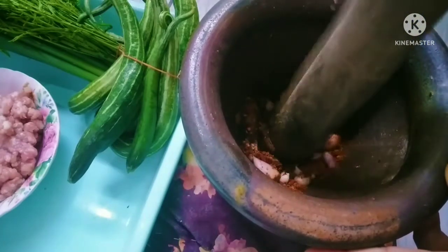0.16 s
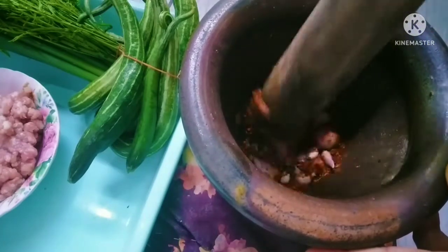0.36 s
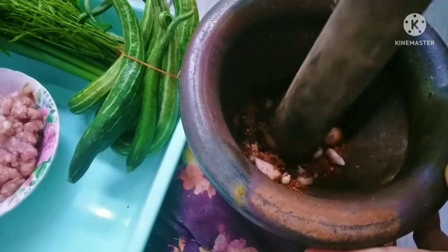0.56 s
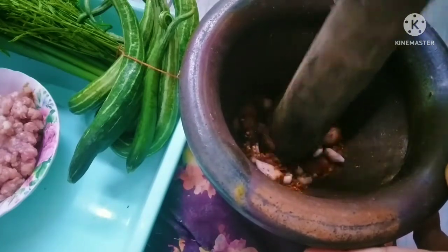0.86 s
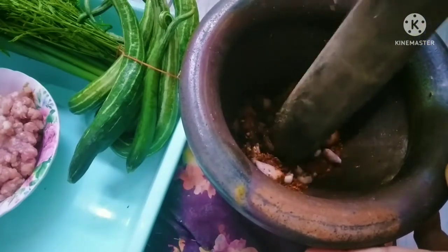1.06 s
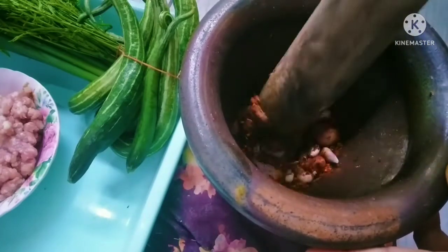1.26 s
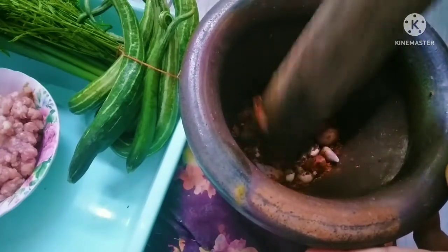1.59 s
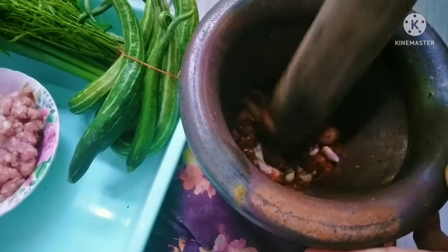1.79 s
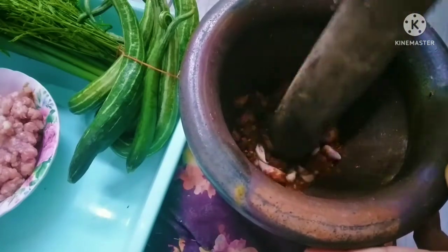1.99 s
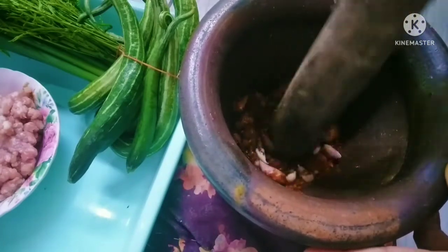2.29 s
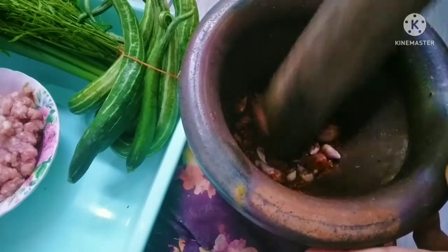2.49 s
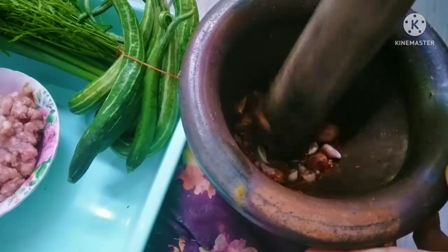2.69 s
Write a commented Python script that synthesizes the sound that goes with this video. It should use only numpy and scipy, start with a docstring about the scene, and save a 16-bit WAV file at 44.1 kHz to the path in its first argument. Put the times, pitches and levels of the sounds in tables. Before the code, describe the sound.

A pestle pounds garlic and chili in a clay mortar with steady, crunchy thuds.

```python
"""A wooden pestle pounds garlic, shallots and chili in a clay mortar, a little over three blows a second.
Each blow scrapes down the wall, crushes the paste in a burst of tiny cracks and knocks the hollow bowl;
the mortar rocks and rebounds on a booming table. Twice the pestle slips and ticks against the wall.
A small kitchen answers. Behind it sit thin distant chirps, a hiss that drops out now and then
and a low rumble."""
import sys
import numpy as np
from scipy import signal
from scipy.fft import rfft, irfft
from scipy.io import wavfile

SR = 44100
rng = np.random.default_rng(int(sys.argv[2]) if len(sys.argv) > 2 else 0)


def bounce(signal):
    """Save signal as a 16-bit WAV file at the path given by the first command-line argument."""
    frames = np.transpose(np.atleast_2d(signal))
    limited = np.clip(frames, -1, 1)
    pcm = np.round(limited * 32767).astype(np.int16)
    wavfile.write(sys.argv[1], SR, pcm)


N = 125685

# pestle blows (time [s], thump gain [dB], knock gain [dB], knock pitch [Hz], knock t60 [s],
# clay gain [dB], crush gain [dB], crush length [s], treble gain [dB], scrape gain [dB])
BLOWS = [(0.2038, 1.5, -2.5, 361, 0.059, -9, -3.5, .0015, 2, -12.5),
         (0.499, 1, 1, 628, 0.031, -5.5, -5, 0.0055, -2.5, -17),
         (0.7987, -1.5, 2.5, 737, 0.042, -1, -6.5, 0.0064, -1.5, -4),
         (1.093, -1, 8, 584, 0.023, -3, -2.5, 0.0052, -1, 4),
         (1.3884, -0.5, -6.5, 585, 0.039, 3.5, -8.5, 0.0019, 2.5, 8.5),
         (1.681, 0, 4, 624, 0.037, 2, -4.5, 0.0074, 1, 3),
         (1.9776, 0.5, 3, 627, 0.035, -2.5, -3.5, 0.0049, 1, -2.5),
         (2.2766, 1.5, 5.5, 647, 0.018, -2.5, -1, 0.0038, -4, -12),
         (2.5702, 1, 13.5, 611, 0.024, 2.5, 6, 0.0022, 0.5, -4.5)]
# the pestle slips against the wall (time [s], crush gain [dB])
SLIPS = [(1.125, -18), (1.412, -11)]
# tone of the crunch (frequency [Hz], gain [dB])
CRUSH_EQ = [(150, -66), (350, 5), (750, -5), (1100, -8.5), (1400, -5.5), (1800, -4.5), (2400, 0.5),
            (3200, 2.5), (4200, -2.5), (5200, -7.5), (6400, -8.5), (7300, -5), (8700, -15.5),
            (10700, -16.5), (12500, -22.5), (15500, -30)]
# modes of the bowl, struck through the paste (frequency [Hz], level [dB], t60 [s])
BOWL_MODES = [(300, -40, 0.084), (375.7, -35, 0.042), (418, -53.5, 0.15), (594.5, -50, .25)]
# resonances of the clay wall (frequency [Hz], relative level [dB], t60 [s])
CLAY_MODES = [(1400, -15, 0.074), (1852, 0.5, 0.0083), (2081, -2, 0.0087), (2391, 5.5, 0.0083),
              (2782, -0.5, 0.016), (3360, -6.5, 0.0083), (4263, -5.5, 0.023)]
# boom of the table, led by a slowly beating pair of low room modes (frequency [Hz], level [dB], t60 [s])
BOOM_MODES = [(55.6, -38, 1), (61.36, -37, 1.0), (101.6, -17.5, 0.11), (122.6, -29, 0.42),
              (138.05, -27.5, 0.62), (158.03, -33, 0.76), (173.56, -26.5, 0.39), (198.45, -35, 0.61),
              (234.4, -37, 0.13)]
# the blow's own push, then the mortar's rebounds after it (delay [s], level [dB])
REBOUNDS = [(.0022, -18), (0.0112, -19.5), (.019, -27), (0.0238, -19.5), (.0402, -22.5), (0.056, -24)]
# decay of the kitchen's tail (frequency [Hz], t60 [s])
ROOM_DECAY = [(200, 0.55), (600, 0.2837), (2500, 0.43), (7000, 0.42), (14000, 0.42)]
# tone of that tail (frequency [Hz], gain [dB])
ROOM_EQ = [(80, -13), (300, -9.5), (700, -9), (2500, -13.5), (7000, -13.5), (14000, -14.5)]
# distant chirps (start [s], length [s], level [dB])
CHIRPS = [(0.282, 0.11, -58), (1.225, 0.28, -61.5), (1.941, .08, -54), (2.627, 0.1, -58),
          (2.754, 0.12, -57.5)]
# tone of the hiss (frequency [Hz], gain [dB])
HISS_EQ = [(300, -5), (900, 5.5), (1500, 2.5), (3000, 7), (5000, 0), (6500, -0.5), (7400, 1), (8800, -6.5),
           (10700, -10.5), (12500, -17), (15500, -19)]
# fader ride on the hiss (time [s], level [dB])
HISS_RIDE = [(0, -62), (.35, -62), (.9, -62), (0.999, -64.5), (1.249, -62), (1.6, -61), (1.9, -62),
             (2.35, -59.5), (2.55, -59), (2.741, -63), (2.85, -64)]
# treble dropouts in the background (start [s], end [s])
LULLS = [(.072, .198), (.398, .492), (.616, .79), (.921, .998), (1.891, 1.96), (2.128, 2.27)]
# tone of the rumble (frequency [Hz], gain [dB])
RUMBLE_EQ = [(20, -9), (40, -1.5), (60, 1), (85, -4), (115, -17), (150, -9), (200, -17.5), (300, -27.5),
             (500, -30.5), (750, -35), (1300, -49), (3000, -63.5), (8000, -73.5), (15000, -81)]
# how alike the two channels are (frequency [Hz], likeness [0-1])
STEREO_LIKENESS = [(100, 1), (600, 0.62), (2000, 0.82), (5000, 0.27), (14000, 1)]
# balance of the two microphone ports (frequency [Hz], left minus right [dB])
PORT_BALANCE = [(200, -1.5), (380, 4), (600, -5.5), (900, 0.5), (2000, 1.5), (3500, 1), (5000, 3),
                (7300, 11.5), (8800, 3), (10700, -21.5), (13000, -1), (15000, -3)]
# phase between the ports (frequency [Hz], left lead [rad])
PORT_PHASE = [(0, 0), (2760, 1.5337), (4130, 1.36), (4650, 6.5), (5600, 7.5), (6890, 9), (7670, 4.5),
              (11800, 8), (13100, 8), (15500, 8)]

PRE_ROLL_S = .05  # space for the scrape ahead of each impact


def pounding():
    """Every blow and slip of the pestle; returns the close sound and the kitchen's answer."""
    t = np.arange(SR) / SR - PRE_ROLL_S
    close, room = np.zeros((2, 2, N))
    for time, thump_db, knock_db, knock_hz, knock_t60, clay_db, *paste in BLOWS:
        grit = crush(t, *paste)
        hit = grit + amp(knock_db) * knock(t, knock_hz, knock_t60) + amp(clay_db) * clay_ring(t, grit)
        add(close, time - PRE_ROLL_S, hit + amp(thump_db) * thump(t))
        add(room, time - PRE_ROLL_S, kitchen(hit))
    for time, db in SLIPS:
        add(close, time - PRE_ROLL_S, crush(t, db, length=.0012, treble_db=-11, scrape_db=-25))
    # the table still rings from a blow 0.09 s before the start
    return close + amp(-4.5) * thump(np.arange(N) / SR + .09), room


def crush(t, crush_db, length, treble_db, scrape_db):
    """A swelling scrape down the wall, then a burst of tiny cracks as the paste gives way."""
    rise_s, fall_s, swell_s, scrape_s, grain_db = .0011, .002, .012, .023, 3.5
    scrape = np.exp(-abs(t) / swell_s) * np.clip((t + scrape_s) / .004, 0, 1) * (t < 0)
    burst = np.exp(np.minimum(t + length, 0) / rise_s - np.maximum(t, 0) / fall_s)
    burst *= np.clip(1 + t / length / 2, .5, 1)  # leans into the impact
    cracks = rng.standard_normal((2, len(t))) * amp(grain_db * np.minimum(rng.exponential(1, len(t)), 5))
    grit = unit(eq(stereo(cracks), CRUSH_EQ))
    grit = eq(grit, [(2300, 0), (9200, treble_db)])  # high shelf
    return grit * (amp(crush_db - 28.5) * burst + amp(scrape_db - 44) * scrape)


def knock(t, cavity_hz, cavity_t60):
    """The bowl rings under the paste; the air inside adds the hollow note."""
    rise_s, cavity_db = .0019, -27.5
    return ring(BOWL_MODES + [(cavity_hz, cavity_db, cavity_t60)], t + rise_s, rise_s)


def clay_ring(t, grit):
    """The crushing stirs the short, bright resonances of the clay wall."""
    wall = ring(CLAY_MODES, t[t >= 0], rise_s=1 / SR)
    return amp(-11) * signal.fftconvolve(grit, wall[None] / np.linalg.norm(wall), axes=1)[:, :SR]


def thump(t):
    """The low end: the pestle presses the mortar down; it rocks, rebounds and sets the table and the room's
    lowest modes ringing."""
    press_s, release_s, rebound_hz = .0077, .0014, 128.6
    rock_hz, rise_s, hold_s, stop_s = 60.7, .006, .0563, .0024
    press = -amp(-35) * np.exp(np.minimum(t, 0) / press_s - np.maximum(t, 0) / release_s)
    gate = np.clip(t / rise_s, 0, 1) * (1 - np.tanh((t - hold_s) / stop_s)) / 2
    rock = amp(-22.5) * gate * np.sin(2 * np.pi * rock_hz * t)
    out = press + rock + ring(BOOM_MODES, t, rise_s=.0096)
    for delay, db in REBOUNDS:
        spread = (np.pi * rebound_hz * (t - delay)) ** 2
        out += amp(db) * (1 - 2 * spread) * np.exp(-spread)  # one soft, round pulse
    return out


def kitchen(x):
    """Quick reflections from the bowl and worktop, then a short diffuse tail."""
    likeness, early_db, early_t60 = .55, -12.5, .12
    t = np.arange(SR // 2) / SR
    hz, age, bands = signal.stft(stereo(rng.standard_normal((2, len(t))), likeness), SR, nperseg=256)
    bands *= amp(-60 * age / curve(ROOM_DECAY, hz)[:, None])
    tail = signal.istft(bands, SR)[1][:, :len(t)] * np.minimum(t / .0035, 1)
    tail = eq(tail / np.linalg.norm(tail[0]), ROOM_EQ)
    early = stereo(rng.standard_normal(tail.shape), likeness) * amp(-60 * t / early_t60) * (t > .002)
    reverb = tail + amp(early_db) * early / np.linalg.norm(early[0])
    return signal.fftconvolve(x, reverb, axes=1)[:, :x.shape[1]]


def chirps():
    """Thin, raspy, falling chirps, perhaps a bird outside: a narrow band of noise swept down."""
    start_hz, sag_hz_per_s, width_hz, rise_s = 6270, 9100, 1560, .018
    out = np.zeros((2, N))
    for start, length, db in CHIRPS:
        t = np.arange(0, length, 1 / SR)
        noise = rng.standard_normal((2, len(t))) + 1j * rng.standard_normal((2, len(t)))
        rasp = signal.lfilter(*signal.butter(3, width_hz / 2, fs=SR), noise)
        sweep = np.exp(2j * np.pi * np.cumsum(start_hz - sag_hz_per_s * t) / SR)
        envelope = np.minimum(t / rise_s, 1) * np.sqrt(1 - t / length)
        add(out, start, amp(db) * unit(stereo((rasp * sweep).real)) * envelope)
    return out


def hiss():
    """A faint, airy bed whose level wavers by about 1 dB around a slow fader ride."""
    t = np.arange(N) / SR
    waver_db = unit(sum(np.sin(2 * np.pi * (hz * t + rng.random())) for hz in np.geomspace(1, 20, 20)))
    return amp(np.interp(t, *np.transpose(HISS_RIDE)) + waver_db) * noise_bed(HISS_EQ)


def lulls(x):
    """Ducks the mids and treble between some blows; the lows pass untouched."""
    depth_db, close_s, open_s, crossover_hz = -30, .012, .028, 660
    t = np.arange(N) / SR
    duck = sum(np.clip(np.minimum((t - start) / close_s, (end - t) / open_s), 0, 1)
               for start, end in LULLS)
    low = irfft(rfft(x) / (1 + (freqs(x) / crossover_hz) ** 10), N)
    return low + (x - low) * amp(depth_db * duck)


def rumble():
    """A steady floor of deep noise."""
    return amp(-42.5) * noise_bed(RUMBLE_EQ)


def noise_bed(tone):
    """Stereo noise shaped by an EQ curve, at rms 1."""
    return unit(eq(stereo(rng.standard_normal((2, N))), tone))


def ring(modes, t, rise_s):
    """Decaying sines that build up from t = 0."""
    t = np.maximum(t, 0)
    partials = sum(amp(db - 60 * t / t60) * np.sin(2 * np.pi * hz * t) for hz, db, t60 in modes)
    return (1 - np.exp(-t / rise_s)) * partials


def stereo(x, likeness=1):
    """Narrows the image by blending left into right, band by band."""
    left, right = rfft(x)
    blend = np.clip(likeness * curve(STEREO_LIKENESS, freqs(x)), 0, .99)
    return irfft(np.array([left, blend * left + np.sqrt(1 - blend ** 2) * right]), x.shape[-1])


def eq(x, points):
    """Filters x by a curve of (frequency [Hz], gain [dB])."""
    return irfft(rfft(x) * amp(curve(points, freqs(x))), x.shape[-1])


def curve(points, hz):
    """Reads a table on a log-frequency axis."""
    point_hz, value = np.transpose(points)
    return np.interp(np.log(hz + 1), np.log(point_hz), value)


def freqs(x):
    """Frequencies of the spectrum of x."""
    return np.fft.rfftfreq(x.shape[-1], 1 / SR)


def amp(db):
    """Decibels to gain."""
    return 10 ** (np.asarray(db) / 20)


def unit(x):
    """Scales to rms 1."""
    return x / np.sqrt(np.mean(x ** 2) + 1e-20)


def add(mix, start_s, sound):
    """Drops a sound onto the timeline."""
    part = mix[..., round(start_s * SR):][..., :sound.shape[-1]]
    part += sound[..., :part.shape[-1]]


def scene():
    """Pounding up front; room, chirps and hiss duck together behind it, over the rumble."""
    close, room = pounding()
    return close + lulls(room + hiss() + chirps()) + rumble()


def record(dry):
    """Two microphone ports, each with its own colour and delay, then a steep high cut."""
    hz, side = freqs(dry), np.array([[.5], [-.5]])
    balance = amp(side * curve(PORT_BALANCE, hz))
    phase = side * np.interp(hz, *np.transpose(PORT_PHASE))
    ports = irfft(rfft(dry) * balance * np.exp(1j * phase), N)
    high_cut = signal.firwin(401, cutoff=15600, window=("kaiser", 9), fs=SR)
    return signal.oaconvolve(ports, high_cut[None], "same")


dry = scene()
out = record(dry)
bounce(out)
```